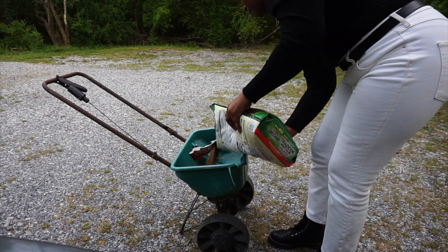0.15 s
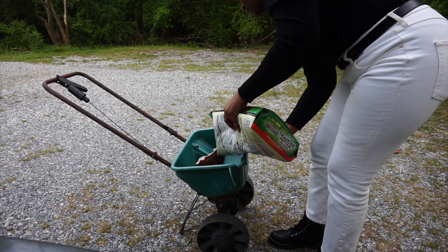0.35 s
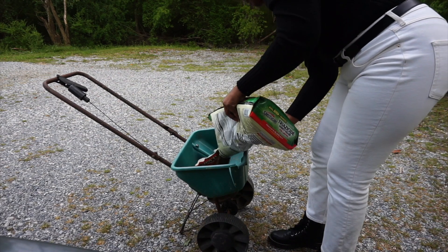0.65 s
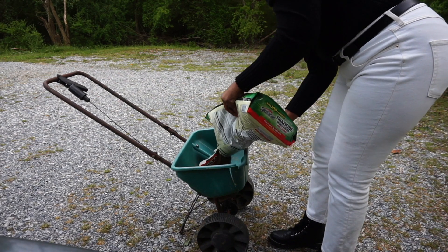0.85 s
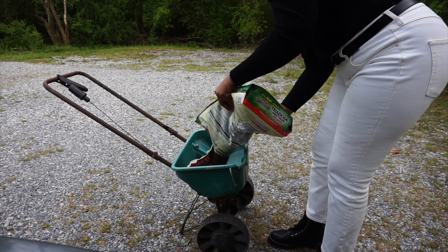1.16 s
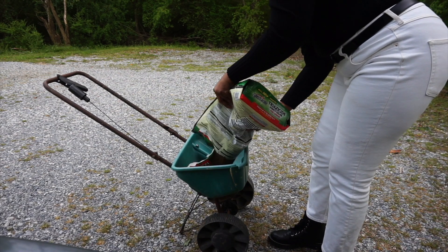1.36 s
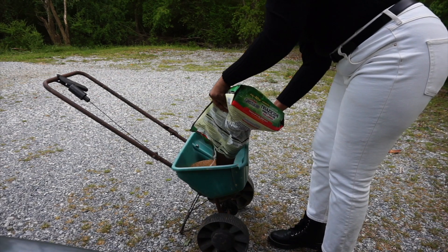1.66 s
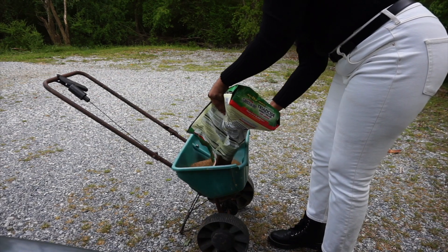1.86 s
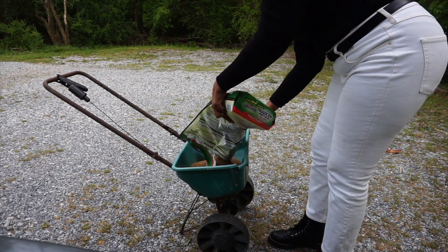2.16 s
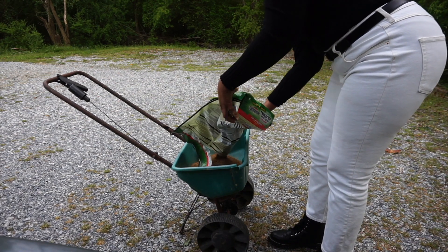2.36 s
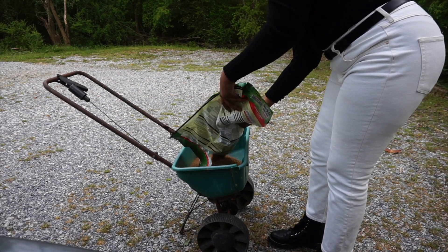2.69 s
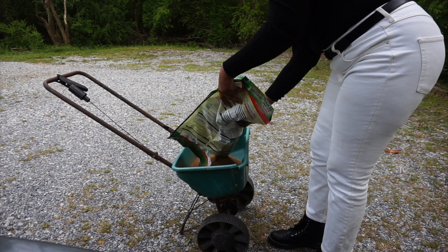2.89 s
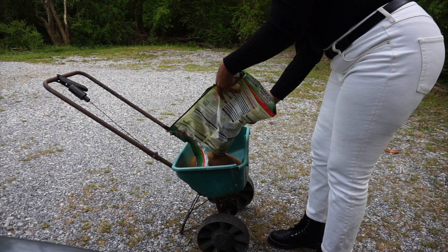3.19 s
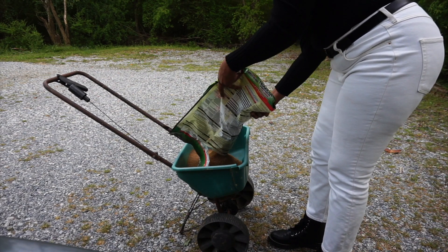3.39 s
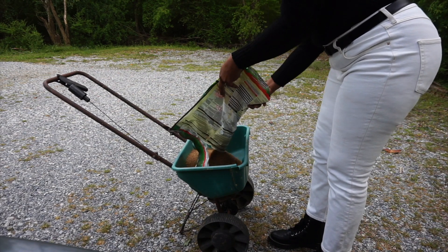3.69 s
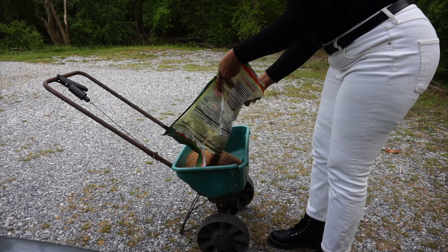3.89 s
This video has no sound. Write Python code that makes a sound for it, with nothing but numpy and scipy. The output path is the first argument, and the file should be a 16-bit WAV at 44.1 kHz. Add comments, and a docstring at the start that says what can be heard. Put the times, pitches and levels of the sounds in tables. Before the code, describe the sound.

A thin, gritty trickle grows into a steady rushing pour of grains in a plastic bin, with dull clunks clustering around three seconds.

```python
"""Granules pouring into a plastic hopper

Granules stream from a bag into the hopper of a spreader. Grains drum on its walls (random clicks
ringing resonances) and hiss on each other (clicks coloured in bands). Landing clumps and bag creases
knock (short noise clusters ringing the same hopper); a distant rumble (banded noise) lies underneath."""
import sys
import numpy as np
from scipy import signal
from scipy.io import wavfile
from scipy.ndimage import map_coordinates

SR = 44100
rng = np.random.default_rng(int(sys.argv[2]) if len(sys.argv) > 2 else 0)


def dump(signal):
    """Clip the signal to [-1, 1] and save it as 16-bit WAV at the path in sys.argv[1]."""
    limited = np.clip(np.atleast_2d(signal).T, -1, 1)
    pcm = np.round(limited * 32767).astype(np.int16)
    wavfile.write(sys.argv[1], SR, pcm)


N = 178119

# resonances of the hopper: [f/Hz, width/Hz, level/dB, left over right/dB]
HOPPER_RESONANCES = [(291, 56, 0.5, 0), (531.5, 67, -4.5, -1.5), (604.4, 28, -2.5, -2.5), (753, 59, -3, -4),
                     (883, 61, -1, -1.5), (1111, 167, -2.5, -9.5), (1281, 54, -2.5, -1), (1448, 83, -1, -6),
                     (1790, 122, -3.5, -1), (1961, 63, -0.5, 0), (2213, 170, 0.5, -3.5),
                     (2556, 107, -1, -1), (2776, 91, -3, -8.5), (3364, 630, -11.5, -6), (4347, 68, -6.5, 0),
                     (4900, 42, -26, 12), (5810, 30, -9, -4)]
BOOM_TOP_HZ, HOLLOW_TOP_HZ = 400, 1200      # limits between the three parts of the hopper sound


def from_db(db):
    """Turn decibels into an amplitude factor."""
    return 10 ** (np.asarray(db) / 20)


def rms_one(x):
    """Scale a signal to an overall rms of 1."""
    return x / np.sqrt(np.mean(x ** 2) + 1e-20)


def level_one(pair):
    """Scale a stereo pair so that its middle (mean of left and right) has rms 1."""
    middle = pair.mean(axis=0)
    return pair / np.sqrt(np.mean(middle ** 2))


def at_hz(points, hz):
    """Read a curve of (frequency, value) points, with straight lines over log frequency."""
    point_hz, values = np.transpose(points)
    return np.interp(np.log(hz), np.log(point_hz), values)


def drift(rate_hz):
    """Slow random wander of spread 1: noise at every 40th sample through a double one-pole low-pass."""
    r = np.exp(-80 * np.pi * rate_hz / SR)
    noise = rng.standard_normal(N // 40 + 2002)
    slow = signal.lfilter([1], [1, -2 * r, r * r], noise)[2000:]      # skip the filter's start
    return np.interp(np.arange(N) / 40, np.arange(len(slow)), rms_one(slow))


def resonance(x, hz, width_hz):
    """A two-pole resonance rings at its own pitch, longer when narrower; gain about 1 on top."""
    r = np.exp(-np.pi * width_hz / SR)
    feed = np.array([1, 0, -1]) * (1 - r * r) / 2
    feedback = [1, -2 * r * np.cos(2 * np.pi * hz / SR), r * r]
    return signal.lfilter(feed, feedback, x)


def spread(mid, side, hz, pan_db):
    """Left and right share one sound and differ by another; pan_db is left over right."""
    # how alike left and right are: [f/Hz, likeness/0-1]
    likeness = [(30, 1), (65, 1), (140, 0.77), (270, 0.85), (570, 0.87), (1200, 0.79), (2500, 0.86),
                (5000, 0.38), (6500, 0.6), (8200, 0.9), (10500, 0.92)]
    alike = np.clip(at_hz(likeness, hz), 0, 1)
    pair = np.sqrt(1 + alike) * mid + np.sqrt(1 - alike) * side * [[1], [-1]]
    return pair * from_db([[pan_db / 2], [-pan_db / 2]])


def grains(per_s, uneven_db):
    """Grain impacts are two unrelated showers of random clicks of uneven size; overall rms 1."""
    size_db = uneven_db * np.minimum(rng.exponential(1, (2, N)), 5)
    sizes = from_db(size_db) * rng.choice([-1, 1], (2, N))
    lands = rng.random((2, N)) < per_s / SR
    return rms_one(sizes * lands)


def bands(sources, spectrum, low_hz, count, patchy_db, pan_db):
    """Colour two sources in third-octave bands, each flickering on its own; middle rms 1."""
    out, edges = 0, low_hz * 2 ** (np.arange(count + 1) / 3)
    for k, (low, high) in enumerate(zip(edges, edges[1:])):
        band = signal.butter(2, [low, high], "band", fs=SR, output="sos")
        mid, side = signal.sosfilt(band, sources[k % 2])      # neighbouring bands use different sources
        hz = np.sqrt(low * high)
        level_db = at_hz(spectrum, hz) + patchy_db * drift(11.0)
        out = out + from_db(level_db) * spread(mid, side, hz, pan_db)
    return level_one(out)


def part_of(hz):
    """Sort a resonance into a part of the hopper sound: 0 boom, 1 hollow, 2 walls."""
    return (hz > BOOM_TOP_HZ) + (hz > HOLLOW_TOP_HZ)


def through_dips(x):
    """The hopper radiates little in narrow bands: take away a resonance at each."""
    # dips between the resonances and under the boom: [f/Hz, width/Hz, depth/0-1]
    dips = [(192, 68, 1), (389, 17, 0.16), (676, 6.4, 0.47), (942, 10, 0.1), (1327, 35, 0.8), (1522, 33, 1)]
    for hz, width_hz, depth in dips:
        x = x - np.clip(depth, 0, 1) * resonance(x, hz, width_hz)
    return x


def drumming(boom_db, hollow_db, wall_db, surge):
    """Grains ring every resonance of the hopper; the low ones answer to the lumps of the stream."""
    shower, parts, lumps = grains(3500, uneven_db=2.0), [0, 0, 0], drift(25)
    for k, (hz, width_hz, level_db, pan_db) in enumerate(HOPPER_RESONANCES):
        mid, side = resonance(shower, hz, width_hz)
        sign = (-1) ** k
        rung = sign * from_db(level_db + 1.41 * drift(11.6)) * spread(mid, side, hz, pan_db)
        parts[part_of(hz)] = parts[part_of(hz)] + rung
    boom, hollow, walls = [through_dips(part) for part in parts]
    boom = from_db(boom_db) * level_one(from_db(2.6 * lumps) * boom)
    hollow = from_db(hollow_db) * level_one(from_db(1.74 * lumps + 0.81 * surge) * hollow)
    walls = from_db(wall_db) * level_one(from_db(1.0 * surge) * walls)
    return boom + hollow + walls


def grain_hiss(flow_db, surge):
    """Grains hiss on each other: dense clicks, coloured in bands, follow the flow."""
    # colour of the hiss: [f/Hz, relative level per Hz/dB]
    hiss_colour = [(1470, -29), (2500, -1.5), (3940, -14), (4270, -10), (4690, 8.5), (5530, -8),
                   (6870, -10), (9340, -5.5), (10900, -9), (14200, -41), (22000, -120)]
    showers = [grains(14000, uneven_db=2.0) for _ in range(2)]
    hiss = bands(showers, hiss_colour, 2410, count=7, patchy_db=0.53, pan_db=-1.0)
    return from_db(flow_db + 1.5 + 0.56 * surge) * hiss


def far_rumble():
    """The distant rumble is low noise whose bands waver separately."""
    # colour of the rumble: [f/Hz, relative level per Hz/dB]
    rumble_colour = [(13, -40), (22, -24), (43, -3), (65, -0.5), (97, 0.5), (189, -10.5), (230, -5.5),
                     (300, -16), (510, -120)]
    noise = rng.standard_normal((2, 2, N))
    return from_db(-50) * bands(noise, rumble_colour, 20.1, count=11, patchy_db=2.5, pan_db=0.0)


def blows_on_hopper():
    """List sharp knocks, then fainter ones of nearly equal boom, hollow and walls, in the same columns."""
    # clumps landing and bag creases:
    # [t/s, hollow level/dB, hollow centre f/Hz, boom level/dB, walls level/dB, length/s]
    sharp_knocks = [(0.01, -29, 560, -38, -41, 0.003), (0.097, -29, 560, -48, -48, 0.005),
                    (0.444, -34, 610, -36, -35, 0.003), (0.582, -37, 610, -45, -41, 0.003),
                    (0.734, -42, 790, -42, -23, 0.009), (1.107, -30, 610, -34, -42, 0.004),
                    (1.268, -36, 1100, -38, -30, 0.003), (1.937, -36, 610, -55, -25, 0.006),
                    (2.104, -21, 850, -36, -38, 0.005), (2.124, -25, 790, -41, -36, 0.003),
                    (2.153, -31, 910, -35, -28, 0.003), (2.224, -33, 610, -42, -34, 0.003),
                    (2.449, -47, 520, -34, -25, 0.003), (2.639, -31, 610, -39, -26, 0.005),
                    (2.8015, -30, 610, -35, -17, 0.003), (2.868, -23, 790, -26, -18, 0.008),
                    (2.958, -27, 790, -41, -34, 0.003), (3.019, -25, 1100, -38, -26, 0.003),
                    (3.075, -17, 700, -24, -15, 0.007), (3.086, -21, 1100, -32, -21, 0.003),
                    (3.127, -30, 790, -30, -34, 0.003), (3.172, -24, 1100, -35, -20, 0.007),
                    (3.18, -26, 610, -39, -25, 0.003)]
    # fainter knocks: [t/s, boom level/dB]
    faint_knocks = [(1.238, -40), (1.394, -40), (1.419, -38), (2.063, -39), (2.201, -37), (2.377, -39),
                    (2.472, -34), (2.496, -34), (2.591, -36), (2.605, -36), (2.689, -34), (2.72, -37)]
    hollow_db, walls_db = -4, -1      # of a faint knock, relative to its boom
    centre_hz, length_s = 600, .003
    faint_rows = [(s, db + hollow_db, centre_hz, db, db + walls_db, length_s) for s, db in faint_knocks]
    return sharp_knocks + faint_rows


def knocks():
    """A first contact and a dying cluster of smaller ones ring the hopper, damped by the load."""
    level_span_s = .01      # each blow's level is that of its energy spread over this time
    s, hollow_db, centre_hz, boom_db, wall_db, length_s = np.transpose(blows_on_hopper())[:, :, None]
    size = 3072      # samples per blow
    noise = rng.standard_normal((len(s), size))
    cluster = 8 * length_s * noise ** 3 * np.exp(-np.arange(size) / SR / length_s)
    cluster[:, 0] = 1      # the longer the tumble, the less the first contact stands out
    soften = signal.butter(2, 2500, fs=SR, output="sos")
    cluster = signal.sosfilt(soften, cluster)      # soft, broad contacts
    parts = [0, 0, 0]
    for hz, width_hz, level_db, pan_db in HOPPER_RESONANCES:
        # in the hollow, resonances near the centre of the knock take most of the blow
        off_db = -24 * np.log2(hz / centre_hz) ** 2 * (part_of(hz) == 1)
        # the load damps the ringing: twice the width
        rung = from_db(level_db + off_db) * resonance(cluster, hz, 2.0 * width_hz)
        left_right = from_db([[[pan_db / 2]], [[-pan_db / 2]]])
        parts[part_of(hz)] = parts[part_of(hz)] + rung * left_right
    parts[0] = resonance(parts[0], 380, 300)      # the small hopper gives off little deeper sound
    blows = 0
    for db, part in zip((boom_db, hollow_db, wall_db), map(through_dips, parts)):
        energy = np.sum(part.mean(axis=0) ** 2, axis=1, keepdims=True)
        blows = blows + from_db(db) * part * np.sqrt(level_span_s * SR / energy)
    out = np.zeros((2, N + size))
    for k, at in enumerate(np.round(s[:, 0] * SR).astype(int)):
        out[:, at:at + size] += blows[:, k]
    return out[:, :N]


def scene():
    """Pour the granules: the flow drives drumming and hiss, knocks and the far rumble join."""
    # flow of granules, as the level of their hiss: [t/s, level/dB]
    flow = [(0, -37.5), (.05, -31.5), (.13, -29.5), (.33, -36.5), (.41, -30), (.52, -33), (.62, -32),
            (.86, -34.5), (1.1, -31), (1.3, -25.5), (1.55, -28), (1.93, -27.5), (2.07, -28.5),
            (2.21, -24.5), (2.36, -27.5), (2.6, -24.5), (2.69, -27), (2.76, -25), (3.22, -24), (3.63, -31),
            (3.78, -27.5), (4.04, -25)]
    # level of the stream in the hollow of the hopper: [t/s, level/dB]
    hollow_levels = [(0, -38), (.15, -38.5), (.6, -40), (.9, -44), (1.35, -37.5), (1.9, -35), (2.15, -34),
                     (2.4, -37), (3.15, -31), (3.6, -37.5), (4.04, -34)]
    # wall and boom parts: [level at mean flow/dB, share of the flow's swing that is followed]
    walls_follow = (-26.5, 0.87)
    boom_follows = (-45, 0.33)
    mean_flow_db = -28
    heap_full_s, heap_damps_db_per_s = 2.9, 6.5
    left_lag_s = .00002

    t = np.arange(N) / SR
    flow_db = np.interp(t, *np.transpose(flow))
    swing_db = flow_db - mean_flow_db
    wall_db, boom_db = [db + share * swing_db for db, share in (walls_follow, boom_follows)]
    hollow_db = np.interp(t, *np.transpose(hollow_levels))
    # the growing heap damps the boom of the hopper air
    boom_db = boom_db - heap_damps_db_per_s * np.maximum(t - heap_full_s, 0)
    surge = drift(6.9)      # the flow is uneven: hiss, hollow and walls swell together
    left, right = drumming(boom_db, hollow_db, wall_db, surge) + knocks()
    # the hopper stands to the right: its sound reaches the left side a little later
    left = map_coordinates(left, [np.arange(N) - left_lag_s * SR], order=3, mode="nearest")
    return np.array([left, right]) + grain_hiss(flow_db, surge) + far_rumble()


def record(dry):
    """Round the peaks with a soft limit, then cut the top with a steep low-pass."""
    soft = np.tanh(dry)
    # order 18, ripple 0.5 dB, at least 72 dB down in the stop band; cutoff at 11010 Hz
    top_cut = signal.ellip(18, .5, 72, 11010, fs=SR, output="sos")
    return signal.sosfilt(top_cut, soft)


dry = scene()
out = record(dry)
dump(out)
```